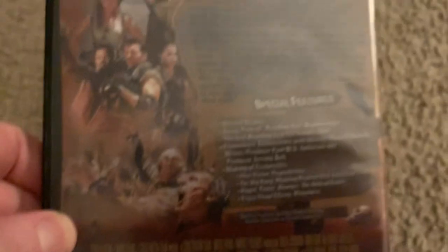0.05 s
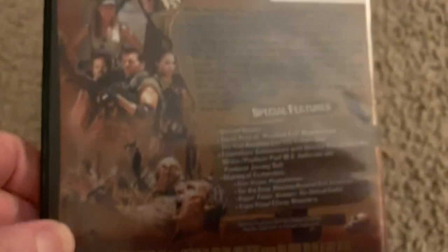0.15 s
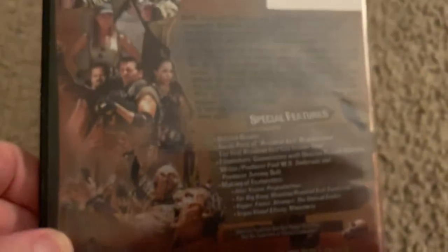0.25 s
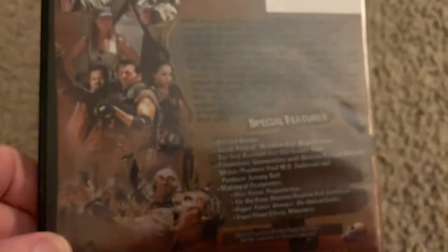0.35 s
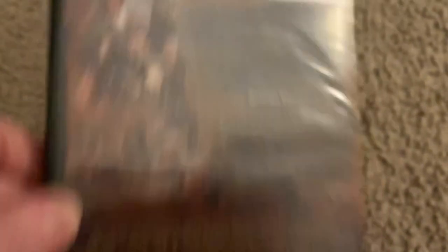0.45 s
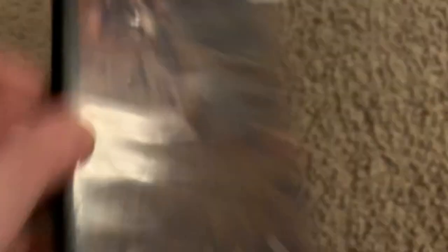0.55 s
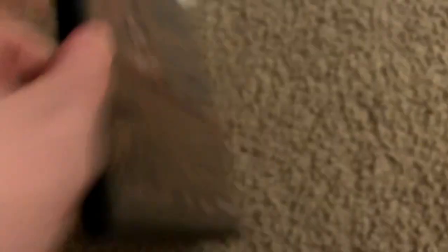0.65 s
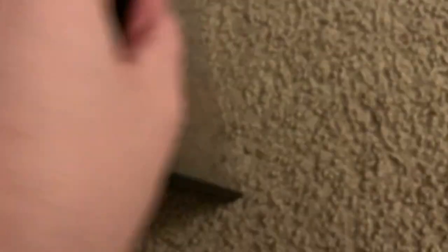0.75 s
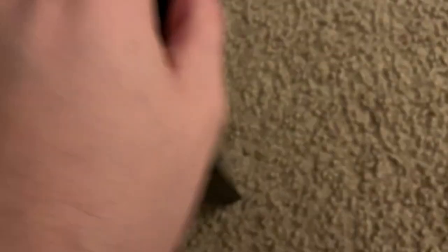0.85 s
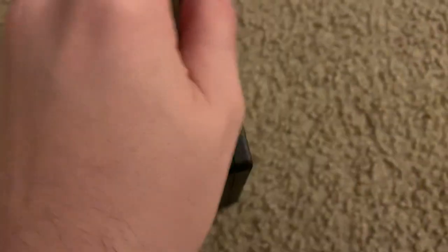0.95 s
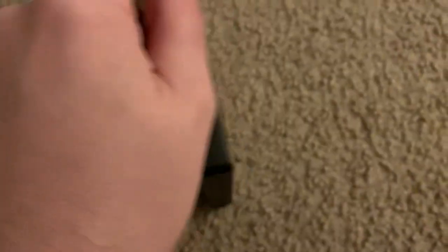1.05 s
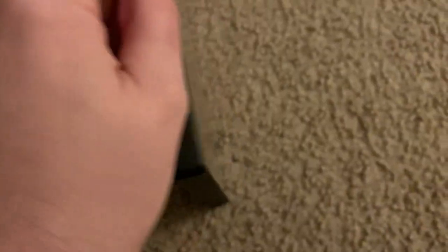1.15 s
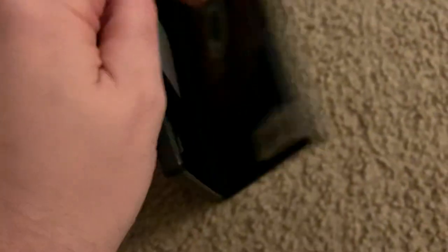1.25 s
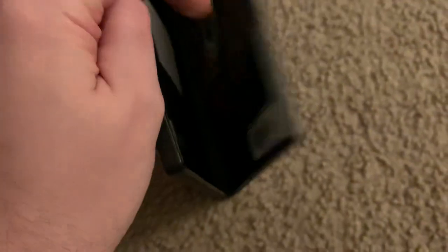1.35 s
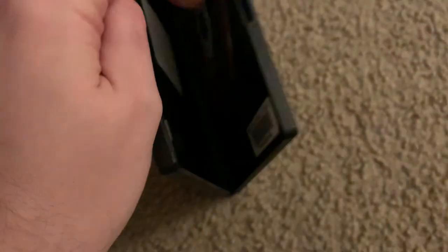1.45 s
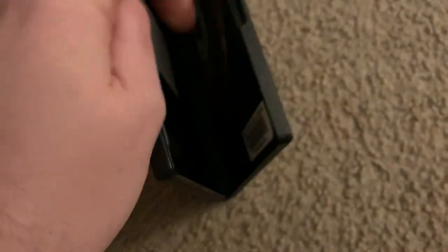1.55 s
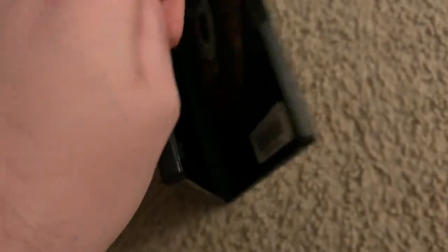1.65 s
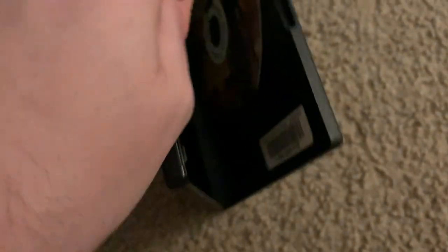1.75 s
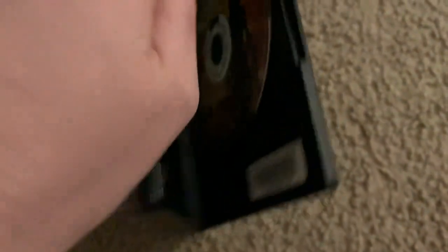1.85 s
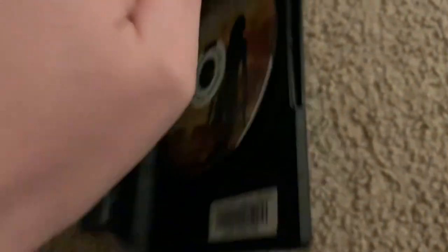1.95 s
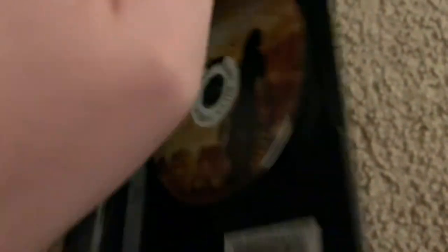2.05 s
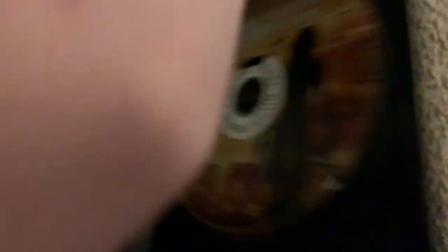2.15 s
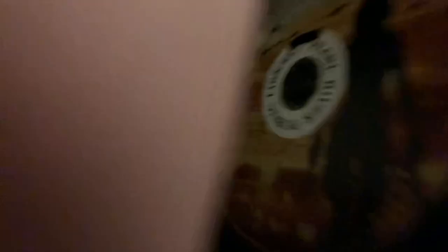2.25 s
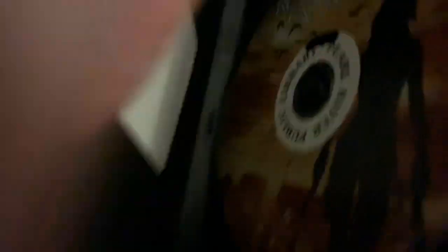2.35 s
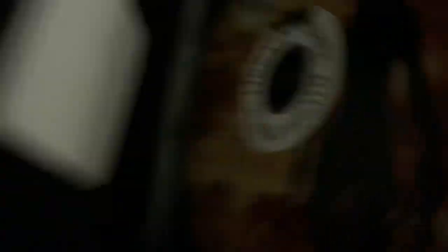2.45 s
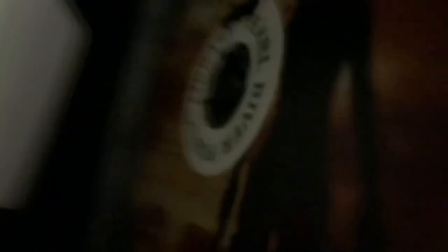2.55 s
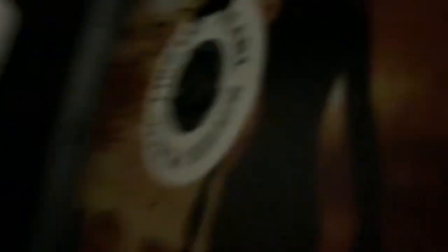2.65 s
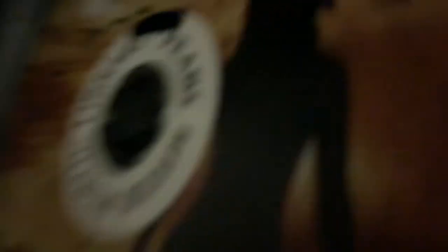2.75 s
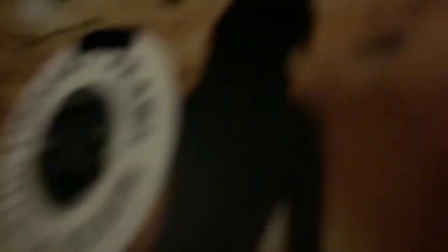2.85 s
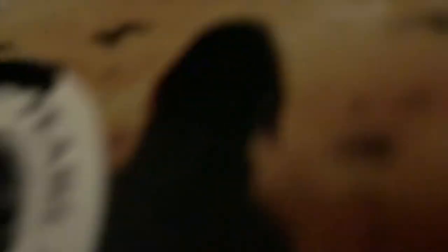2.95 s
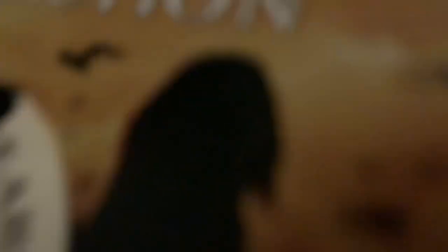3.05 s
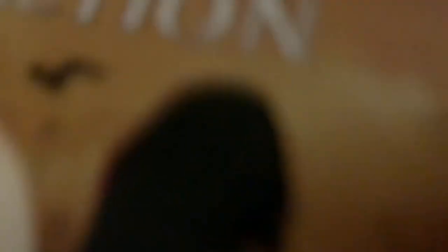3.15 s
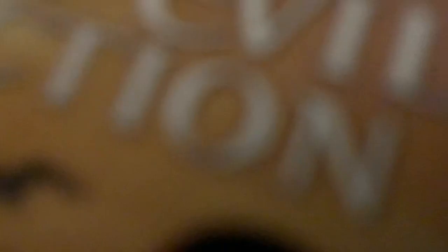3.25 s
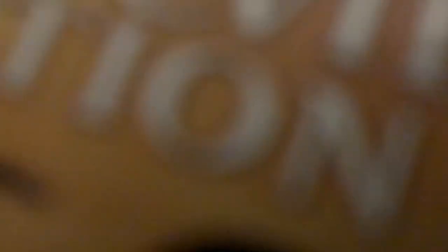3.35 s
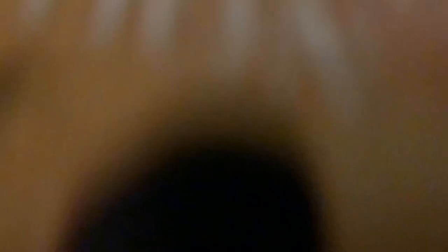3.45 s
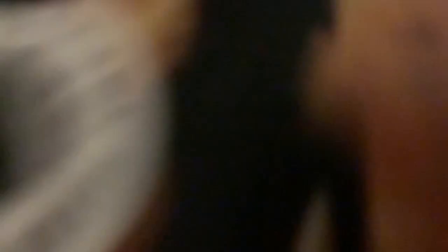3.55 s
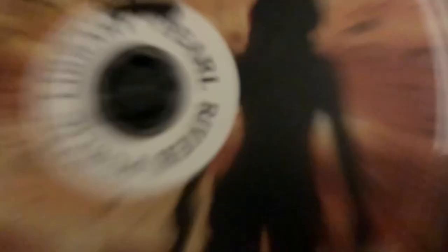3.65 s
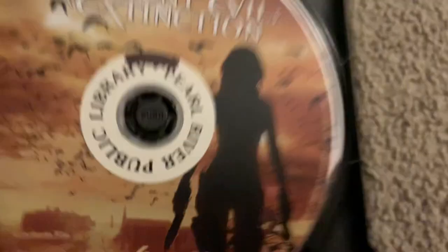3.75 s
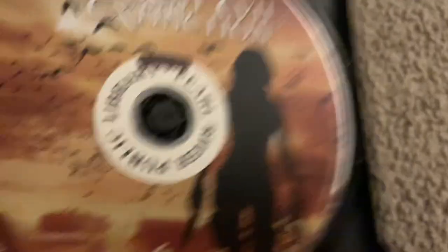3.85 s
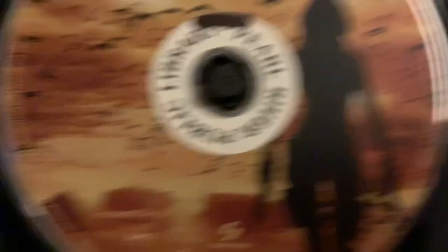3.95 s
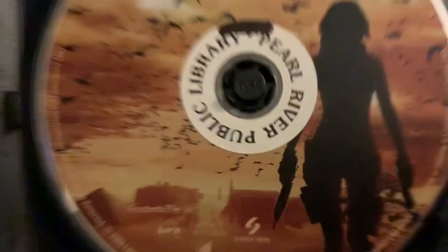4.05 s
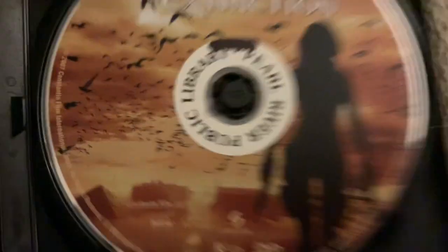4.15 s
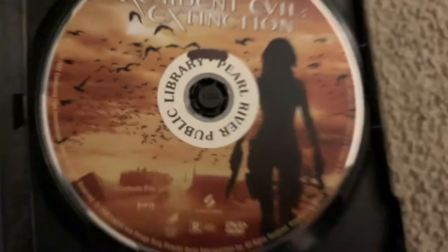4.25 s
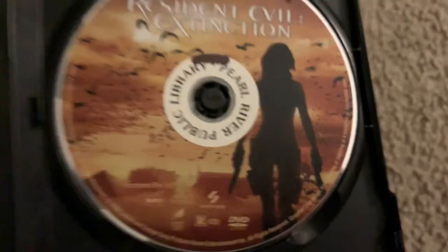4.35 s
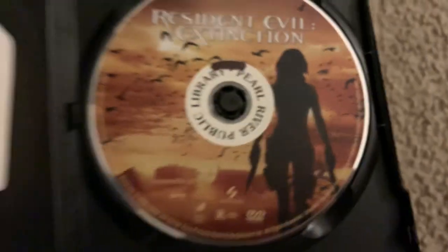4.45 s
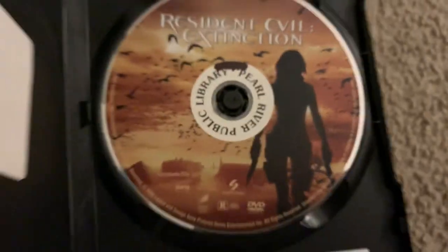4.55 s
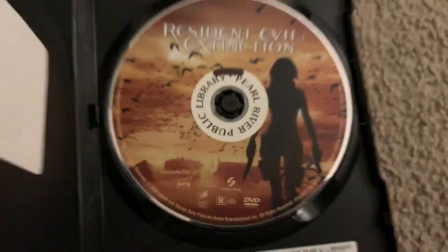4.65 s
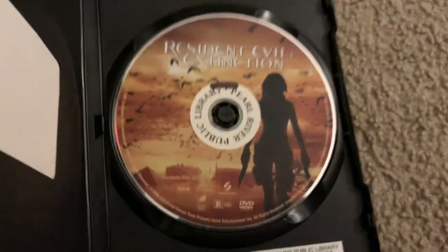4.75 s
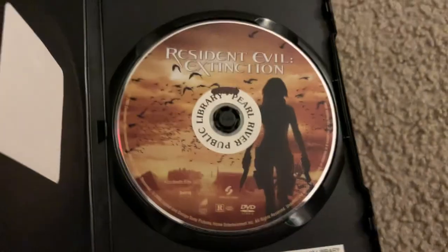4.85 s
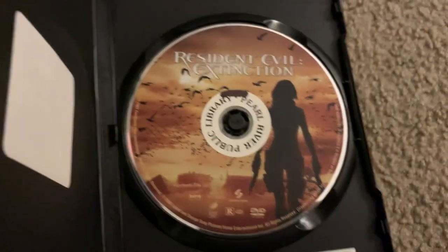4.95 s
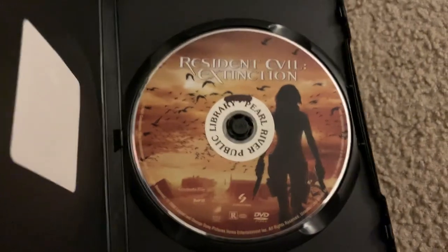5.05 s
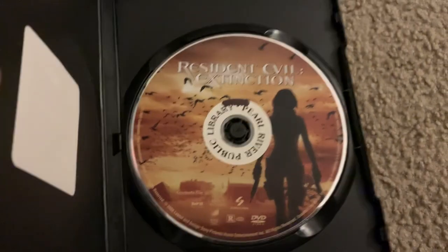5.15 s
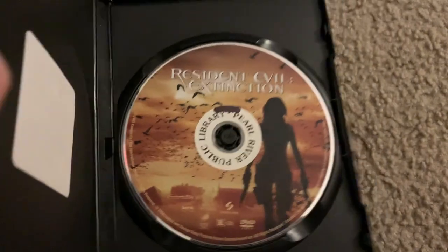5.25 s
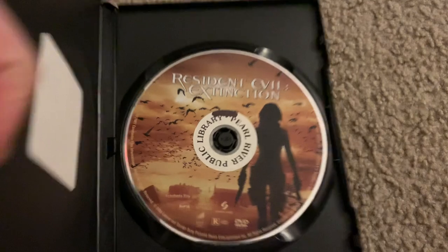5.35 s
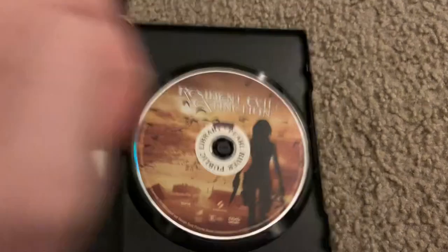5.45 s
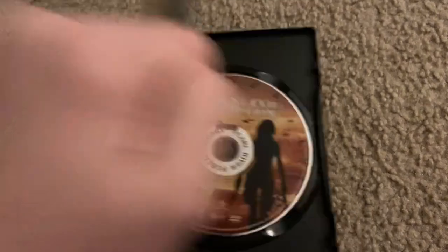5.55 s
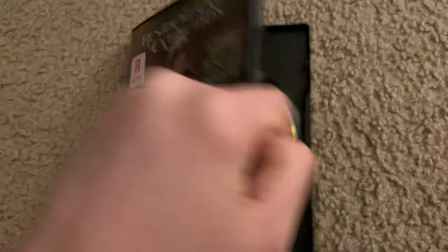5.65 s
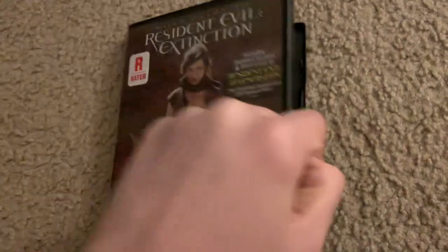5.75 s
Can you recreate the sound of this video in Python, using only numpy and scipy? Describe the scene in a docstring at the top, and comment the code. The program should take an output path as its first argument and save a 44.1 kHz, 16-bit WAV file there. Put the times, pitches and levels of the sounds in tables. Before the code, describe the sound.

Fingers rub a thin plastic disc case in a quiet carpeted room; it cracks open, gets knocked hard, then snaps shut after a lull.

```python
"""Rumble and hiss lie throughout under a quiet furnished room, as coloured noise. On a carpet a thin plastic
disc case is turned, its sleeve rubbed by the fingers (grainy noise), and latches and ribs begin to crack
(noise bursts on resonances). As it is pried open the freed cover shudders; dry taps and dull knocks
(smooth pulses) follow, and the open cover quivers in narrow tones. After a lull it is pushed shut with cracks.
The hand-held recorder knocks against the case; its stereo stage turns the phase and lets the bass arrive late."""
import sys
import numpy as np
from scipy import signal
from scipy.fft import rfft, irfft, next_fast_len
from scipy.io import wavfile

SR = 44100
rng = np.random.default_rng(int(sys.argv[2]) if len(sys.argv) > 2 else 0)


def inscribe(sig):
    """Save sig as 16-bit PCM at rate SR to the path in sys.argv[1].

    A 1-D sig is mono; a 2-D sig holds one channel per row.
    Samples are clipped to [-1, 1] before scaling.
    """
    pcm = np.round(np.clip(np.atleast_2d(sig).T, -1, 1) * 32767)
    wavfile.write(sys.argv[1], SR, pcm.astype(np.int16))


N = 255339  # samples

# Spectrum of the room rumble. Each row: frequency in Hz, relative density in dB.
RUMBLE_SPECTRUM = [(12, -51.5), (20, -21.5), (52, -3.5), (76, 4), (95, -2), (120, -16.5), (225, -13.5),
                   (380, -27), (464, -37.5), (555, -26), (1500, -41.5), (1950, -69.5), (3300, -120)]
# Spectrum of the hiss. Each row: frequency in Hz, relative density in dB.
HISS_SPECTRUM = [(700, -24.5), (1200, -3.5), (2500, -0.5), (5000, -6), (7000, -5), (9000, 0), (11000, 3),
                 (14000, -1), (16500, -9)]
RUMBLE_DB, HISS_DB = -67.5, -80  # rms levels

# Strokes of the hands. Each row: start in seconds, swell before it in seconds, length in seconds, then five
# levels in dB: skin sliding on the sleeve, its treble, walls of the case, hollow body, shaking of the recorder.
STROKES = [(0.28, 0.06, 0.07, -81, -87, -84, -89, -70), (0.47, 0.06, 0.05, -81, -67, -83, -87, -74),
           (0.555, 0.07, 0.022, -60.5, -51, -66, -65.5, -56.5),
           (0.635, 0.05, 0.04, -66.5, -55, -67, -70, -60),
           (0.709, 0.08, 0.052, -62.5, -56, -66, -67.5, -64),
           (0.799, 0.05, 0.04, -68, -71.5, -79, -70, -60.5), (0.88, 0.05, 0.041, -73.5, -73, -83, -78, -74),
           (0.954, 0.08, 0.027, -66.5, -58.5, -77, -73, -59),
           (1.027, 0.027, 0.03, -72.5, -78, -74.5, -64, -61.5),
           (1.211, 0.015, 0.11, -47.5, -54, -50, -58.5, -50.5),
           (1.379, 0.015, 0.04, -50.5, -58, -48.5, -63.5, -52.5),
           (1.5, 0.06, 0.07, -88, -86, -80, -98, -76.5), (1.767, 0.08, 0.05, -70, -69, -77.5, -67.5, -66),
           (1.839, 0.05, 0.02, -67, -66, -76, -55.5, -60),
           (1.88, 0.08, 0.06, -65.5, -61, -73, -66.5, -62.5),
           (1.992, 0.05, 0.05, -82, -80, -85.5, -78, -78),
           (2.274, 0.03, 0.085, -61.5, -63.5, -70.5, -56, -47),
           (2.389, 0.05, 0.07, -78, -84, -77, -66.5, -62), (2.543, 0.03, 0.08, -52, -72, -54.5, -46, -41.5),
           (2.678, 0.05, 0.11, -75, -81.5, -76, -58, -49.5),
           (2.857, 0.05, 0.2, -88.5, -86.5, -85.5, -70, -65),
           (3.151, 0.03, 0.07, -71.5, -78, -73, -53, -44.5),
           (3.259, 0.05, 0.1, -78, -94, -76.5, -69, -50.5),
           (3.425, 0.04, 0.025, -78, -68.5, -74, -48.5, -49.5),
           (3.47, 0.05, 0.04, -76, -74, -78, -61.5, -48), (3.57, 0.05, 0.073, -94, -99, -92, -81, -59),
           (5.272, 0.07, 0.06, -87, -91, -87, -84, -71), (5.483, 0.015, 0.03, -51, -55, -45, -50, -48),
           (5.54, 0.04, 0.11, -59, -61.5, -55.5, -55.5, -56.5), (5.7, 0.05, 0.1, -70, -73, -69.5, -71, -66)]
# The same five levels in dB while the hands are still.
RESTING_GRIP_DB = (-92, -93, -95, -89.5, -73.5)
SWELL_DB, STROKE_FALL_DB_PER_S = 30, 300  # gain over the swell; decay after the hold
# Spectrum of skin sliding on the sleeve. Each row: frequency in Hz, relative density in dB.
SLIDE_SPECTRUM = [(900, -18), (1600, -1.5), (2500, -3), (4000, -4.5), (6500, -2.5), (8500, -5), (10500, 0),
                  (13000, -5.5), (15500, -11.5)]

# Resonances of the case. Each row: frequency in Hz, width in Hz, level in dB.
CASE_MODES = [(260, 44, -4.5), (426, 85, -1), (534, 150, -0.5), (692, 140, -1.5), (833, 47, -8.5),
              (983, 100, -4), (1586.5, 420, -7.5), (2165, 220, -7), (2640, 250, 1.5), (2851, 380, -1),
              (3060, 260, -2), (3440, 980, -7), (4110, 240, -3), (5200, 2100, -5), (6917, 870, 5.5),
              (7830, 2100, 6), (9300, 3600, 6.5), (12900, 580, -1.5), (14800, 5400, -4.5)]
BODY_TOP_HZ, RIBS_FROM_HZ, TREBLE_FROM_HZ = 1300, 3000, 5000

# Cracks of the plastic. Each row: start in seconds, driving level in dB, hollow body, ribs and treble in dB
# over it, decay time t60 of the spray in seconds, left over right in dB.
CRACKS = [(0.55, -35.5, 2, -2, -4, 0.031, 4), (0.583, -52, -13, 0, 10, 0.022, -2.5),
          (0.638, -38.5, -1, 5, 0, 0.046, 2), (0.658, -42, 3.5, 6, 1.5, 0.026, 5),
          (0.802, -49.5, 10, -3, -14, 0.022, 4), (0.975, -50, -11.5, 0, 9, 0.039, 0),
          (1.192, -11, 3, 0, -5, 0.02, -4.5), (1.202, -8.5, -8, 2, -1, 0.042, -1.5),
          (1.209, -13, -9, 5, -6, 0.081, -3), (1.365, -19, -5.5, 0.5, -12, 0.035, 1),
          (1.372, -8, -14.5, 1.5, -4, 0.043, 0), (1.389, -19.5, -8.5, 11, -5, 0.018, 1.5),
          (1.917, -45, -2.5, -6, 3, 0.027, 1.5), (2.523, -20.5, 14, -5, -30, 0.052, -3),
          (2.532, -10.5, -4, -6, -5.5, 0.038, 16), (2.54, -15, -8.5, -4, -2, 0.011, 9),
          (2.55, -23.5, -13.5, -4, -10, 0.02, 7.5), (2.576, -21, 5.5, -3, -1.5, 0.036, 1),
          (2.588, -22.5, -5, -5.5, -12.5, 0.02, 16), (2.596, -11.5, 3.5, -6, -7.5, 0.02, 16),
          (2.601, -20, -2.5, -4, 2.5, 0.019, 4.5), (2.625, -28, 1.5, -4.5, -28, 0.05, 6.5),
          (2.63, -22, -8, -6, -7, 0.025, 16), (5.462, -16, -5.5, -1, -10.5, 0.03, 14.5),
          (5.471, -12, -7, -10, -9.5, 0.026, 5), (5.482, -23, -1.5, -2, -9, 0.039, 10.5),
          (5.508, -15, -14, -9, -12, 0.032, 5), (5.552, -35, -7.5, -2, -11, 0.03, 7),
          (5.582, -22.5, -9, -2.5, -15, 0.019, -6), (5.596, -35, -0.5, 1, -12, 0.043, 9),
          (5.622, -17, -8, -0.5, -10, 0.032, 0), (5.635, -33, 1.5, 4, -23, 0.022, 7)]
CRACK_RISE_S = 0.0012  # time constant
# Shudder of the freed cover: evenly paced cracks, each weaker than the last.
SHUDDERS, SHUDDER_FROM_S, SHUDDER_EVERY_S, SHUDDER_T60_S = 6, 1.2225, 0.0208, 0.07
SHUDDER_DB, SHUDDER_LOSS_DB = -14, 4.5  # first level; loss per crack
SHUDDER_BODY_DB, SHUDDER_RIBS_DB, SHUDDER_TREBLE_DB = -7, 4, -1  # over the driving level

ROOM_T60_S, ROOM_DB, WALL_CUT_HZ = 0.26, -15.5, 1400  # above the cut the tail dies twice as fast

# Dry taps of fingers, recorder and case on one another. Each row: start in seconds, peak in dB before
# panning, centre in Hz, decay time t60 in seconds, left over right in dB.
TAPS = [(0.551, -29.5, 9000, 0.007, -3), (1.0223, -32, 875, 0.011, 9), (1.202, -3, 4994, 0.0056, -2),
        (1.203, -15, 480, 0.032, 0.5), (2.064, -58.5, 2560, 0.016, 10), (2.2565, -24, 6490, 0.011, -7.5),
        (2.258, -23, 1450, 0.011, 14.5), (2.302, -41, 2020, 0.017, 15.5), (2.343, -47, 1460, 0.03, 11.5),
        (2.37, -56, 2034, 0.015, 15), (2.5246, -15.5, 874, 0.009, -3.5), (3.142, -51, 1302, 0.071, 16),
        (3.153, -33.5, 502, 0.023, 6), (3.164, -51, 1980, 0.017, 25), (3.185, -32, 2340, 0.0053, 17),
        (3.186, -32.5, 613, 0.037, 0), (3.203, -52, 2240, 0.015, 25), (3.204, -35, 590, 0.0096, -2),
        (3.318, -49.5, 1270, 0.026, 11), (3.322, -46, 300, 0.04, 0.5), (3.425, -53.5, 1670, 0.14, 15.5),
        (3.484, -31.5, 262, 0.054, -2), (3.495, -57, 3500, 0.018, 3), (3.493, -32, 876, 0.024, 8),
        (3.502, -35, 445, 0.012, 2), (3.807, -58, 320, 0.041, 9), (5.464, -20.5, 8000, 0.012, -4),
        (5.469, -26, 790, 0.085, 10.5), (5.624, -26.5, 8000, 0.012, -8)]
TAP_RISE_S = 0.00078  # time constant
TAP_SPAN = 1.69  # the band reaches this factor above and below its centre

# Dull knocks. Each row: centre in seconds, peak in dB before the high-pass, contact time in ms
# (centre to 1/e), direction as 1 for a push or -1 for a pull.
KNOCKS = [(1.0185, -36.5, 0.84, 1), (1.1971, -13, 1.4, 1), (1.2163, -20.5, 1.06, 1),
          (1.3732, -35.5, 2.6, 1), (2.254, -9.5, 1.29, 1), (2.521, -6, 2, 1), (2.5393, -1.5, 3.1, -1),
          (2.5788, -15, 1.5, 1), (2.5963, -19, 1.8, 1), (2.6244, -19, 2.5, 1), (3.1515, -24, 2.5, 1),
          (3.1817, -14, 1.36, 1), (3.2029, -24.5, 2.56, 1), (3.3195, -31, 0.67, 1), (3.482, -20.5, 0.77, 1),
          (5.4674, -36.5, 1.9, 1), (5.5073, -40, 1, 1), (5.6253, -37.5, 3.9, 1), (5.6531, -35.5, 1.1, 1)]

# Quiver of the open cover after the hardest knock. Each row: time in seconds, level in dB.
QUIVER = [(2.62, -90), (2.656, -49.5), (2.741, -47.5), (2.759, -56.5), (2.819, -54), (2.846, -78),
          (2.9, -75.5)]
# Tones the cover hums with. Each row: frequency in Hz, width in Hz, level in dB.
COVER_TONES = [(109.1, 20, 7), (514.8, 24, -5.5), (830, 88, -16), (2050, 340, -14.5), (4040, 170, -29)]

# Phase by which the left channel leads; in the treble a plain delay. Each row: frequency in Hz, lead in radians.
LEFT_LEAD = [(0, 0), (110, .05), (170, .9), (260, 3.1), (500, 6.0), (1000, 8.0), (1600, 9.4), (2700, 12.0),
             (4100, 12.8), (6300, 12.5), (10900, 6.3), (15500, 0), (22050, -9)]
BASS_LAG_CYCLES = 1.6
STOP_HZ = 17000


def from_db(db):
    """Decibel law: amplitude ratio of a level."""
    return 10 ** (np.asarray(db) / 20)


def rms_one(x):
    """Normalisation to unit mean power."""
    return x / np.sqrt(np.mean(x ** 2) + 1e-20)


def butter(x, hz, kind, order=2):
    """Maximally flat (Butterworth) filtering."""
    return signal.sosfilt(signal.butter(order, hz, kind, fs=SR, output="sos"), x)


def coloured(x, spectrum):
    """Spectral shaping on a log-frequency axis: -60 dB below the first point, the last held above; rms 1."""
    hz = np.fft.rfftfreq(N, 1 / SR) + 1  # +1 keeps the logarithm finite
    point_hz, point_db = np.transpose(spectrum)
    gain_db = np.interp(np.log(hz), np.log(point_hz), point_db, left=-60)
    return rms_one(irfft(rfft(x) * from_db(gain_db), N))


def resonate(x, hz, width):
    """Damped resonance: a two-pole filter with a gain of about 1 at its peak."""
    r = np.exp(-np.pi * width / SR)
    feedforward = [(1 - r * r) / 2, 0, (r * r - 1) / 2]
    feedback = [1, -2 * r * np.cos(2 * np.pi * hz / SR), r * r]
    return signal.lfilter(feedforward, feedback, x + 1e-18)


def grains(spread_db, own):
    """Random micro-impacts: dense clicks of uneven size, a share of them opposed between the sides."""
    unevenness_db = spread_db * np.minimum(rng.exponential(1, N), 4)
    common, opposed = rng.standard_normal((2, N)) * from_db(unevenness_db)
    return rms_one(common + own * opposed * [[1], [-1]])


def spray(size, rise, t60):
    """Exponential decay: the envelope of a burst of micro-slips."""
    t = np.arange(size) / SR
    return (1 - np.exp(-t / rise)) * from_db(-60 * t / t60)


def sides(pan_db):
    """Level-difference panning: half the difference is added left and taken right."""
    half_db = np.clip(pan_db, -24, 24) / 2
    return from_db(np.array([[half_db], [-half_db]]))


def rumble():
    """Coloured noise: the low rumble of the room, alike on both sides."""
    return from_db(RUMBLE_DB) * coloured(rng.standard_normal(N), RUMBLE_SPECTRUM)


def hiss():
    """Coloured noise: a hiss that differs widely between the sides."""
    return from_db(HISS_DB) * coloured(grains(spread_db=0.5, own=2.8), HISS_SPECTRUM)


def strokes():
    """Addition of powers: each stroke swells, holds and dies away, giving five gains in time."""
    t = np.arange(0, N, 64) / SR
    power = from_db(RESTING_GRIP_DB)[:, None] ** 2 + 0 * t
    for start, swell, length, *levels_db in STROKES:
        swell_below_db = SWELL_DB * np.maximum(start - t, 0) / swell
        fall_below_db = STROKE_FALL_DB_PER_S * np.maximum(t - start - length, 0)
        stroke_db = np.subtract.outer(levels_db, swell_below_db + fall_below_db)
        power = power + from_db(stroke_db) ** 2
    return [np.interp(np.arange(N) / SR, t, np.sqrt(p)) for p in power]


def handling():
    """Stick-slip friction: skin hisses in grains, sets the case murmuring and shakes the recorder."""
    slide_gain, bright_gain, walls_gain, body_gain, shake_gain = strokes()
    # skin sticks and slips
    uneven = from_db(2 * rms_one(butter(rng.standard_normal(N), 40, "low")))
    slide = coloured(uneven * grains(spread_db=3.0, own=0.92), SLIDE_SPECTRUM)
    dull = rms_one(butter(slide, TREBLE_FROM_HZ, "low", order=4))
    bright = rms_one(butter(slide, TREBLE_FROM_HZ, "high", order=4))

    rub = uneven * grains(spread_db=5.0, own=0.46)
    body, walls = np.zeros((2, N)), np.zeros((2, N))
    for hz, width, db in CASE_MODES:
        if hz < BODY_TOP_HZ:
            body += from_db(db) * resonate(rub, hz, width)
        elif BODY_TOP_HZ < hz < TREBLE_FROM_HZ:
            # the walls feel the unevenness twice
            walls += from_db(db) * resonate(uneven * rub, hz, width) * np.sqrt(1000 / width)
    body = rms_one(butter(body, 1100, "low"))  # a soft touch does not reach the upper modes
    walls = rms_one(butter(walls, [900, 4500], "band"))

    shake = rms_one(butter(rng.standard_normal(N), [60, 230], "band", order=3))
    skin = slide_gain * dull + bright_gain * bright
    return skin + walls_gain * walls + body_gain * body + shake_gain * shake


def all_cracks():
    """Geometric decay at an even pace: the shudder of the cover, joined by the single cracks."""
    shudder = []
    for k in range(SHUDDERS):
        start = SHUDDER_FROM_S + SHUDDER_EVERY_S * k
        level_db = SHUDDER_DB - SHUDDER_LOSS_DB * k
        shudder.append((start, level_db, SHUDDER_BODY_DB, SHUDDER_RIBS_DB, SHUDDER_TREBLE_DB, SHUDDER_T60_S, 0))
    return shudder + CRACKS


def crack_colour_db(hz, body_db, ribs_db, treble_db):
    """Modal excitation by region: the part of the case that a resonance belongs to sets its level."""
    if hz < BODY_TOP_HZ:
        return body_db
    if hz < RIBS_FROM_HZ:
        return 0
    return ribs_db if hz < TREBLE_FROM_HZ else treble_db


def cracks():
    """Modal excitation: a dying spray of micro-slips shakes every resonance with a strength of its own."""
    size, rows = 5000, all_cracks()
    slips = grains(spread_db=3.0, own=0.74)
    chance_db = rng.normal(0, 2.5, (len(rows), len(CASE_MODES)))
    sprays = [spray(size, CRACK_RISE_S, t60) * sides(pan_db) for *_, t60, pan_db in rows]
    out = np.zeros((2, N))
    for k, (hz, width, mode_db) in enumerate(CASE_MODES):
        force = np.zeros((2, N + size))
        for row, luck_db, burst in zip(rows, chance_db[:, k], sprays):
            start, level_db, body_db, ribs_db, treble_db, *_ = row
            colour_db = crack_colour_db(hz, body_db, ribs_db, treble_db)
            at = round(start * SR)
            force[:, at:at + size] += from_db(level_db + colour_db + mode_db + luck_db) * burst
        # a narrow resonance takes less from the spray, so it is driven harder; signs alternate
        out += resonate(force[:, :N] * slips, hz, width) * np.sqrt(1000 / width) * (-1) ** k
    return out


def room(x):
    """Diffuse reverberation: a noise tail of its own on each side; the treble dies twice as fast."""
    t = np.arange(SR // 2) / SR
    noise = rng.standard_normal((2, len(t))) * (1 - np.exp(-t / .004))  # soft onset
    low = butter(noise, WALL_CUT_HZ, "low")
    tail = low * from_db(-60 * t / ROOM_T60_S) + (noise - low) * from_db(-120 * t / ROOM_T60_S)
    tail /= np.linalg.norm(tail[0])
    return signal.fftconvolve(x.mean(axis=0, keepdims=True), tail, axes=1)[:, :N]


def taps():
    """Heavily damped impact: no ring, only one broad colour set by the hardness of the contact."""
    size = 4000
    out = np.zeros((2, N + size))
    for start, peak_db, hz, t60, pan_db in TAPS:
        # a steady push of 1.4 underlies the noise
        blow = spray(size, TAP_RISE_S, t60) * (rng.standard_normal(size) + 1.4)
        tap = butter(blow, [hz / TAP_SPAN, hz * TAP_SPAN], "band", order=3)
        at = round(start * SR)
        out[:, at:at + size] += from_db(peak_db) * tap / np.abs(tap).max() * sides(pan_db)
    return out[:, :N]


def knocks():
    """Soft contact: one smooth push or pull; the microphone keeps no static pressure."""
    out, t = np.zeros(N), np.arange(-1000, 1000) / SR
    for centre, peak_db, contact_ms, way in KNOCKS:
        at = round(centre * SR)
        push = np.exp(-(1000 * t / contact_ms) ** 2)
        out[at - 1000:at + 1000] += way * from_db(peak_db) * push
    return butter(out, 58, "high", order=4)


def cover():
    """Narrow-band resonance: the quivering cover keeps a few tones alive."""
    noise, tones = rng.standard_normal(N), np.zeros(N)
    for hz, width, db in COVER_TONES:
        tone = resonate(resonate(noise, hz, width), hz, width)
        tones += from_db(db) * rms_one(tone)
    level_db = np.interp(np.arange(N) / SR, *np.transpose(QUIVER), left=-200, right=-200)
    return from_db(level_db) * tones


def stereo_stage(x):
    """Phase dispersion: the channels differ in phase, and low notes lag by a number of cycles."""
    mid = x.mean(axis=0)
    side = butter((x[0] - x[1]) / 2, [300, 6200], "band", order=3)  # bass and treble come from one port
    size = next_fast_len(N + SR // 2)
    hz = np.fft.rfftfreq(size, 1 / SR)
    lead = np.interp(hz, *np.transpose(LEFT_LEAD))
    lag = 2 * np.pi * BASS_LAG_CYCLES * np.log(hz + 25)  # delay is cycles / (hz + 25)
    turn = np.exp(1j * (np.array([lead / 2, -lead / 2]) - lag))
    return irfft(rfft([mid + side, mid - side], size) * turn, size)[:, :N]


def scene():
    """Superposition: all sources add; the room answers the cracks, and the rumble skips the stereo stage."""
    case = cracks()
    reverberation = from_db(ROOM_DB) * room(case)
    near = handling() + case + reverberation + taps() + knocks() + cover()
    return stereo_stage(near + hiss()) + rumble()


def record(dry):
    """Band limiting: a steep low-pass cuts the top."""
    return signal.sosfilt(signal.cheby2(12, 70, STOP_HZ, fs=SR, output="sos"), dry)


dry = scene()
out = record(dry)
inscribe(out)
```